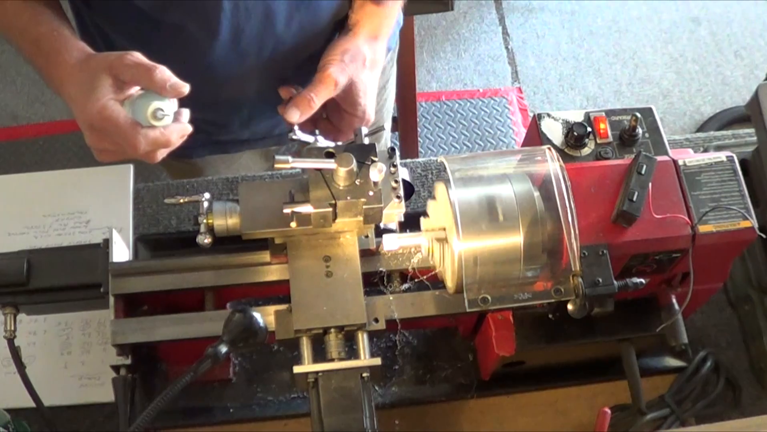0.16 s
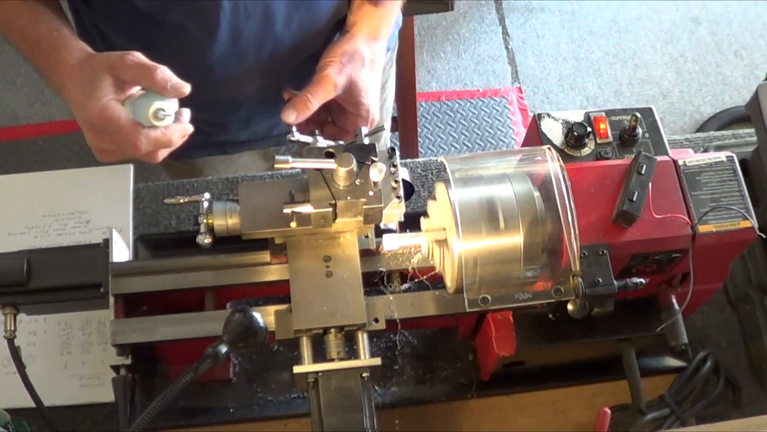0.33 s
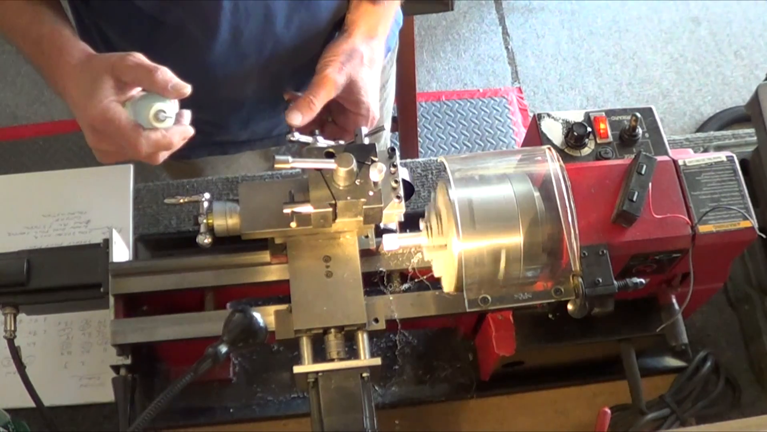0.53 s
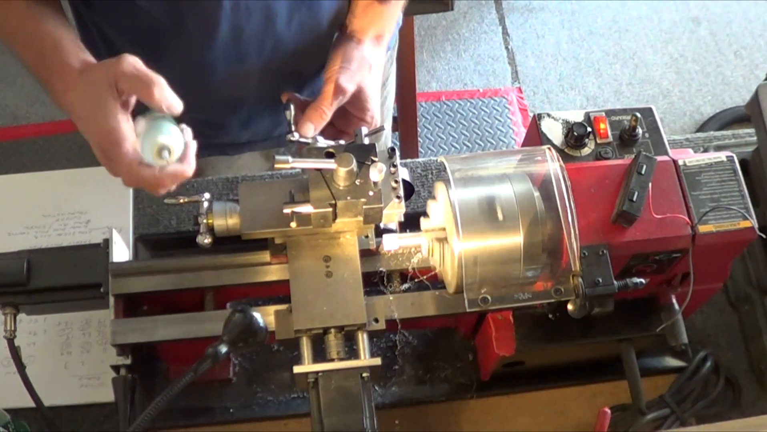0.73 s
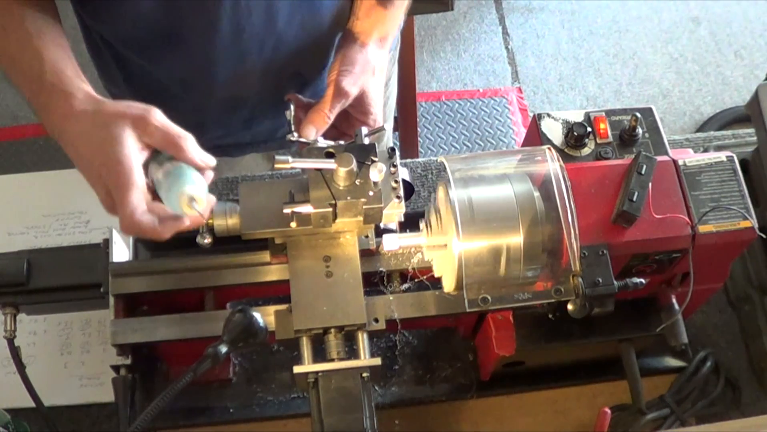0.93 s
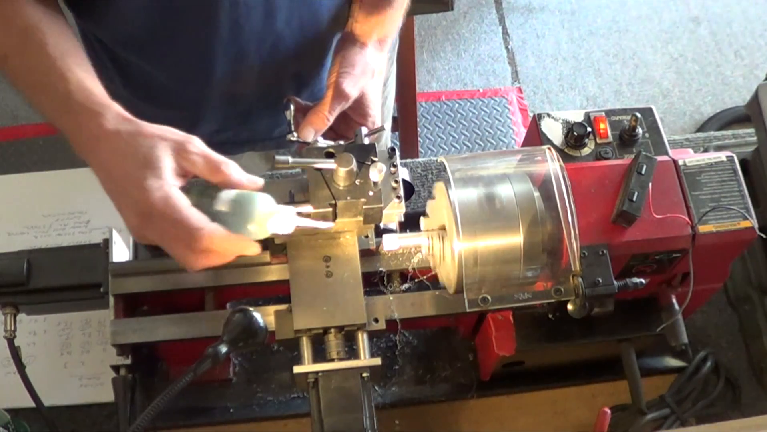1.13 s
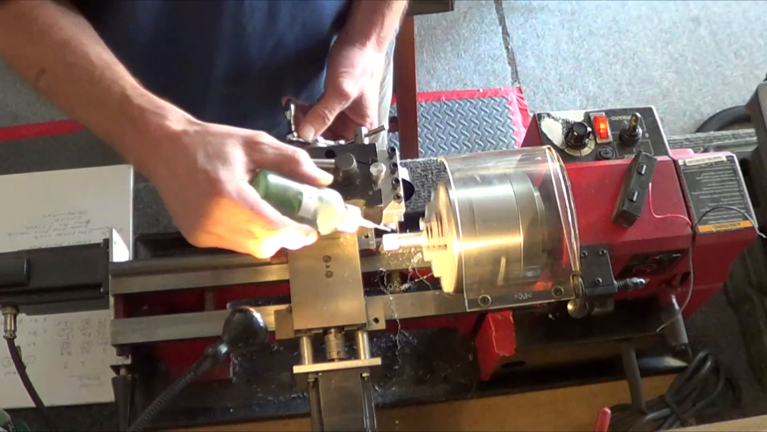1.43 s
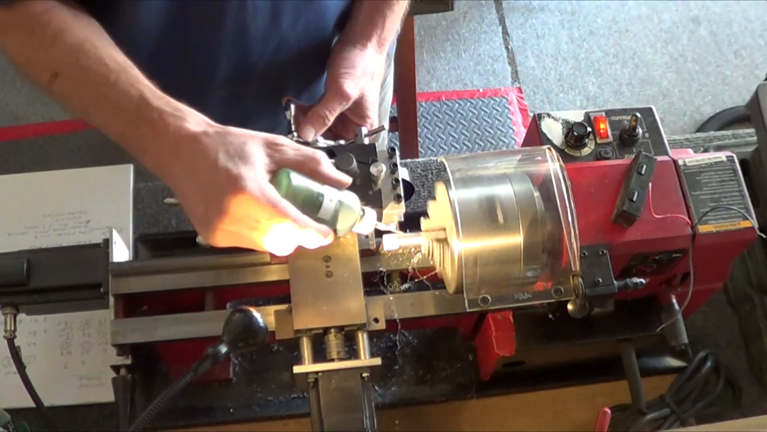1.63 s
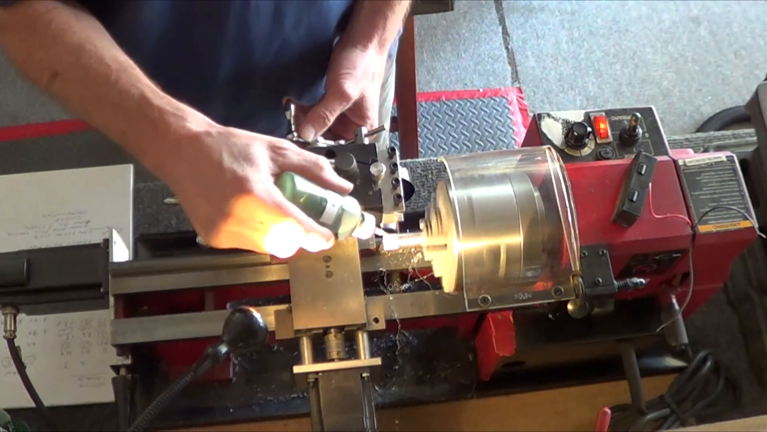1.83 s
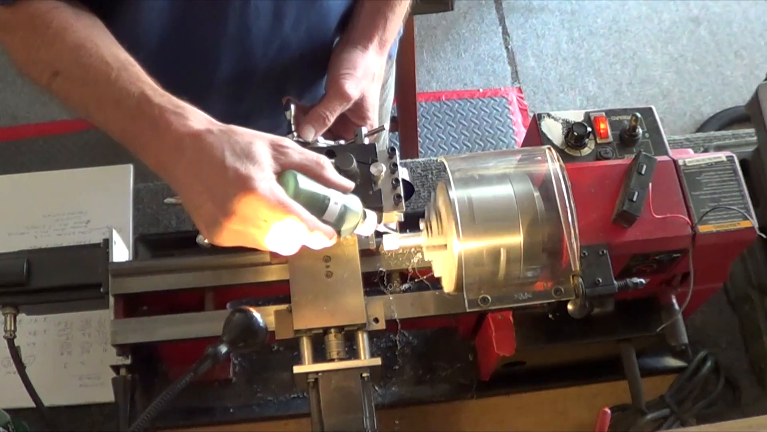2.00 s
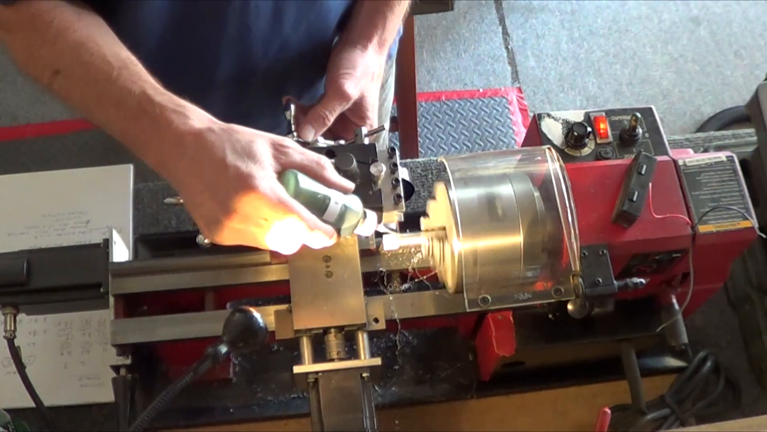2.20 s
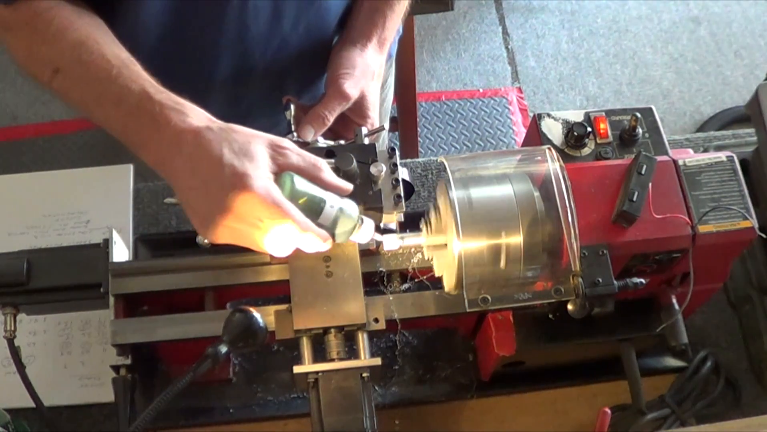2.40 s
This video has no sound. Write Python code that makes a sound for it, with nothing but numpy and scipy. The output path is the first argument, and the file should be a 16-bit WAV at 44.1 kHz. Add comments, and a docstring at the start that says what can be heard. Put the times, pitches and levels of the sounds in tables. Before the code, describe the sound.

A small metal lathe hums and whines while the work scrapes and squeals rhythmically against a tool

```python
"""A small metal lathe in a workshop: from the start the motor hums, a thin steady whistle sounds high above,
and the gears rattle. Then, once a turn, the work rubs on the tool with a gritty scrape; the carriage shudders,
the bed growls. Tool modes add short, beating squeals that grow turn by turn, amid stray ticks and knocks. Last,
the rubs ease off and faint squeaks sag in pitch. Tones are sines; the rest is filtered noise."""
import sys
import numpy as np
from scipy import signal
from scipy.fft import rfft, irfft, next_fast_len
from scipy.io import wavfile

SR = 44100
rng = np.random.default_rng(int(sys.argv[2]) if len(sys.argv) > 2 else 0)


def waveform_to_disk(signal):
    """Save audio, clipped to [-1, 1], as 16-bit WAV at the path in sys.argv[1]."""
    frames = np.transpose(np.atleast_2d(signal))
    scaled = np.clip(frames, -1, 1) * 32767
    samples = np.round(scaled).astype(np.int16)
    wavfile.write(sys.argv[1], SR, samples)


N = 112454  # length in samples

# One rub of work on tool per turn: hardest contact t/s, scrape level/dB, tool ring level/dB,
# squeal level/dB, carriage shudder level/dB
RUB_EVENTS = [(0.259, -39.5, -34.5, -73, -46), (0.426, -33.5, -33, -48, -38),
              (0.598, -34, -32.5, -29.5, -49), (0.764, -34, -35.5, -37, -39),
              (0.937, -35, -31.5, -33, -30.5), (1.106, -35.5, -36, -35, -29.5),
              (1.274, -37, -43, -33.5, -38.5), (1.448, -35.5, -39, -26, -32.5),
              (1.617, -37.5, -42, -25, -32.5), (1.789, -38, -42, -21, -29.5),
              (1.958, -37, -51, -20.5, -31.5), (2.093, -47, -47, -31, -31), (2.295, -59, -60, -43.5, -39),
              (2.446, -47, -39.5, -41, -37.5)]


def undb(db):
    """Level definition: 20 dB is a factor of ten in amplitude."""
    return 10 ** (np.asarray(db) / 20)


def unit(x):
    """Normalization to a root-mean-square amplitude of 1."""
    return x / np.sqrt(np.mean(x ** 2))


def noise():
    """White noise: independent Gaussian samples."""
    return rng.standard_normal(N)


def walk(rate):
    """Low-passed noise: a smooth random drift of rms 1, its spectrum falling beyond rate (Hz)."""
    size = next_fast_len(N, real=True)
    f = np.fft.rfftfreq(size, 1 / SR)
    spectrum = rfft(rng.standard_normal(size)) / (1 + (f / rate) ** 2) ** 2
    return unit(irfft(spectrum, size)[:N])


def colour(x, points):
    """Linear filtering: a gain in dB interpolated between (Hz, dB) points on a log frequency axis."""
    hz, db = np.array(points).T
    log_f = np.log(np.fft.rfftfreq(N, 1 / SR) + 1)
    return irfft(rfft(x) * undb(np.interp(log_f, np.log(hz), db)), N)


def resonate(x, hz, width):
    """Damped resonance: a second-order band-pass of given width (Hz), its output brought to rms 1."""
    size = next_fast_len(N, real=True)
    f = np.fft.rfftfreq(size, 1 / SR) + 1  # avoids division by zero
    response = 1 / (1 + 1j * (f - hz * hz / f) / width)
    return unit(irfft(rfft(x, size) * response, size)[:N])


def grit(spread_db):
    """Impact noise: rapid random level changes make the grains uneven in size."""
    return unit(noise() * undb(spread_db * walk(2250)))


def tone(hz):
    """Phase is the integral of frequency: a sine of rms 1 following a pitch curve."""
    return np.sqrt(2) * np.sin(2 * np.pi * (np.cumsum(hz) / SR + rng.random()))


def swell(t, rise, fall):
    """Gaussian envelope with separate rise and fall times (s) around t = 0."""
    return np.exp(-(t / np.where(t < 0, rise, fall)) ** 2)


def motor(t):
    """Rotating machinery: tones share one wavering speed, over load-dependent rumble. Apart from these, a thin
    steady whistle sounds high above."""
    # Steady tones of motor and gears: f/Hz, level/dB
    tone_lines = [(72.5, -54), (113, -59.5), (193.8, -56), (240, -46.5), (290.5, -45), (360, -44),
                  (448, -58.5), (480, -56.5), (531, -50), (770, -58.5), (1010.4, -46.5), (2141, -52),
                  (3269, -48), (4281.5, -52)]
    # Spectral shape of the drive rumble: f/Hz, relative level/dB
    rumble_shape = [(25, -50), (45, -36), (60, -5.5), (85, -15), (140, -12), (200, -4), (260, -3.5),
                    (300, 2.5), (400, -3), (520, -3.5), (660, -20.5), (900, -15), (1400, -32)]
    # Change of rumble as the tool takes up load: t/s, relative level/dB
    load_curve = [(0, -3), (.4, -2), (1.2, -1.5), (1.75, 0.5), (2.55, 0.5)]
    flutter_db, rumble_db = 0.5, -36.5
    speed = 1 + 0.00052 * walk(5.1)  # rms waver as a fraction

    lines = sum(undb(db + flutter_db * walk(28)) * tone(hz * speed) for hz, db in tone_lines)
    load_db = np.interp(t, *np.array(load_curve).T)
    rumble = undb(rumble_db + load_db) * unit(colour(noise(), rumble_shape))
    whistle = undb(-62) * tone(np.full(N, 15734))
    return lines + rumble + whistle


def gears(t):
    """Forced vibration: teeth rattle with the motor's torque pulses; grit rings the housing in surges."""
    # Spectral shape of the tooth rattle: f/Hz, relative level/dB
    rattle_shape = [(500, -10), (1000, 1), (1800, -4), (2250, 4.5), (2900, -4.5), (3150, -3), (3450, -1.5),
                    (4300, -0.5), (4750, -7), (5600, -12.5), (8000, -8.5), (10500, -11), (13000, -20.5),
                    (15800, -27)]
    # Resonances of the gear housing: f/Hz, width of the narrower filter/Hz, level/dB
    housing_modes = [(1365, 15, -52), (1532, 57, -51.5), (2159, 37, -50.5), (2406, 150, -59),
                     (3288, 31, -45.5), (3367, 24, -47.5), (3525, 41, -49), (3710, 79, -51.5),
                     (4285, 61, -46), (4920, 40, -58), (6970, 180, -56), (8040, 41, -56), (11270, 260, -63)]
    rattle_db, grit_db, surge_db = -39.5, 2.5, 1
    pulse_hz, pulse_depth = 118.2, 0.097

    teeth = grit(grit_db) * (1 + pulse_depth * np.sin(2 * np.pi * pulse_hz * t))
    rattle = undb(rattle_db) * unit(colour(teeth, rattle_shape))
    rings = 0
    for hz, width, db in housing_modes:
        # A broad stage after the narrow one steepens the skirts
        ring = resonate(resonate(grit(grit_db), hz, width), hz, 5 * width)
        rings = rings + undb(db + surge_db * walk(31)) * ring
    return rattle + rings


def workshop(x):
    """Diffuse reverberation: convolution with exponentially decaying noise of unit energy."""
    t60_s = 0.12  # time to decay by 60 dB
    t = np.arange(SR // 2) / SR
    tail = rng.standard_normal(len(t)) * np.exp(-np.log(1000) * t / t60_s)
    return irfft(rfft(x) * rfft(tail / np.sqrt(np.sum(tail ** 2)), N), N)


def rubbing(t):
    """Sliding friction: a choppy rasp excites the tool's resonances, and the tool sings as it bites."""
    # Spectral shape of the scrape: f/Hz, relative level/dB
    scrape_shape = [(400, -5), (900, -4.5), (1450, -6.5), (1900, -2.5), (2500, 0.5), (3000, -3), (3700, 9),
                    (4600, 0), (5500, -13), (6300, -3.5), (7300, -5.5), (7900, -3.5), (8800, -1),
                    (9600, -5.5), (11200, -6), (13500, -15.5), (14500, -9), (15800, -28)]
    # Resonances of tool and holder: f/Hz, width/Hz, level relative to the shaped scrape/dB
    tool_modes = [(6030, 210, -16.5), (6390, 200, -12.5), (7060, 61, -4.5), (7550, 140, -5),
                  (8220, 120, -15), (8980, 100, -12)]
    rise_s, fall_s, grit_db = 0.043, 0.022, 3
    ring_hz, ring_wander_hz, ring_lead_s, ring_s = 3887, 98.3, 0.012, 0.016
    chop_db, chop_hz = 2.5, 254

    contact = sum(undb(r[1]) * swell(t - r[0], rise_s, fall_s) for r in RUB_EVENTS)
    rasp = unit(colour(grit(grit_db), scrape_shape))
    rasp = rasp + sum(undb(db) * resonate(grit(grit_db), hz, width) for hz, width, db in tool_modes)
    chop = unit(undb(chop_db * walk(chop_hz)))
    # The ring peaks just before the hardest contact
    bite = sum(undb(r[2]) * swell(t - r[0] + ring_lead_s, ring_s, ring_s) for r in RUB_EVENTS)
    ring = tone(ring_hz + ring_wander_hz * walk(540))
    return chop * (contact * rasp + bite * ring)


def carriage_shudder(t):
    """Structural resonance: the carriage shudders at a wandering low pitch just after each rub."""
    pitch_hz, wander_hz, lag_s, spread_s = 297.2, 13.5, 0.015, 0.018
    shudder = sum(undb(r[4]) * swell(t - r[0] - lag_s, spread_s, spread_s) for r in RUB_EVENTS)
    return shudder * tone(pitch_hz + wander_hz * walk(65))


def bed_growl(t):
    """Force transmission: the bed growls under the cutting force, its envelope scaled by scrape level."""
    # Spectral shape of the growl: f/Hz, relative level/dB
    growl_shape = [(40, -47), (90, -23), (190, 1.5), (300, 3.5), (450, 1.5), (560, -2), (700, -16),
                   (1000, -7.5), (1400, -12.5), (2000, -12.5), (3500, -33)]
    growl_db, lag_s, spread_s = -1.5, 0.011, 0.052  # level relative to the scrape
    force = sum(undb(r[1]) * swell(t - r[0] - lag_s, spread_s, spread_s) for r in RUB_EVENTS)
    return undb(growl_db) * force * unit(colour(noise(), growl_shape))


def squeal(t):
    """Friction-driven modes: tool tones grow and die exponentially; the two strongest, close ones beat."""
    # Squealing modes of the tool: f/Hz, relative level/dB
    squeal_modes = [(6330, -27), (6930, -12), (7192, -1), (7391, 0), (7650, -22), (8480, -13), (8830, -18)]
    grow_s, die_s, rough_db = 0.012, 0.0055, 0.5
    jitter = 0.008  # rms fraction of the pitch

    grip = 0
    for r in RUB_EVENTS:
        time_constant = np.where(t < r[0], grow_s, die_s)
        grip = grip + undb(r[3]) * np.exp(-np.abs(t - r[0]) / time_constant)
    modes = sum(undb(db) * tone(hz * (1 + jitter * walk(280))) for hz, db in squeal_modes)
    return grip * undb(rough_db * walk(220)) * modes


def ticks_and_knocks(t):
    """Impulsive excitation: band-limited noise starts at once and decays exponentially."""
    # Stray ticks and knocks: onset t/s, f/Hz, width/Hz, onset level/dB, decay time constant/s
    knock_events = [(.485, 1385, 90, -36, 0.017), (.62, 1380, 150, -41, .012),
                    (0.792, 1350, 70, -33.5, 0.027), (1.112, 1530, 120, -39, .02),
                    (1.442, 1520, 100, -39.5, 0.016), (1.648, 1520, 150, -35, 0.009),
                    (1.885, 9000, 7000, -31.5, 0.007), (2.275, 167, 29.7, -35, 0.035),
                    (2.311, 2120, 260, -31, 0.014), (2.436, 4500, 5000, -32.5, 0.0041)]
    knocks = 0
    for start, hz, width, db, decay in knock_events:
        envelope = (t > start) * np.exp(-np.abs(t - start) / decay)
        knocks = knocks + undb(db) * envelope * resonate(noise(), hz, width)
    return knocks


def easing_squeaks(t):
    """Frequency and amplitude modulation: grainy squeaks sag in pitch as the rub eases."""
    # Faint squeaks: centre t/s, f at centre/Hz, level/dB
    squeak_events = [(2.125, 6200, -43), (2.29, 5960, -50), (2.411, 5740, -50), (2.474, 6000, -50)]
    spread_s, sag_hz_per_s, rough_db = 0.019, 5400, 5
    pitch = 1 + 0.018 * walk(550)  # shared pitch jitter
    squeaks = 0
    for centre, hz, db in squeak_events:
        sagging = tone(hz * pitch - sag_hz_per_s * (t - centre))
        squeaks = squeaks + undb(db) * swell(t - centre, spread_s, spread_s) * sagging
    return squeaks * undb(rough_db * walk(400))


def scene():
    """Superposition: machine and cutting sounds add, with room sound opposed between the two ears."""
    # Share of room sound that differs between the ears: f/Hz, gain level/dB
    width_shape = [(30, -35), (125, -5), (280, -14.5), (550, -6), (1000, -9.5), (2000, -11), (4000, -12),
                   (8000, -11.5), (11000, -36)]
    room_db = -18
    t = np.arange(N) / SR
    drive = motor(t) + gears(t)
    cutting = rubbing(t) + carriage_shudder(t) + bed_growl(t) + squeal(t)
    cutting = cutting + ticks_and_knocks(t) + easing_squeaks(t)
    mid = drive + cutting + undb(room_db) * workshop(cutting)
    side = colour(workshop(drive + cutting), width_shape)
    return np.array([mid + side, mid - side])


def record(dry):
    """Band limitation: a steep elliptic low-pass removes the treble above 15.78 kHz."""
    ripple_db, stop_db, top_hz = 0.1, 80, 15780
    low_pass = signal.ellip(12, ripple_db, stop_db, top_hz, fs=SR, output="sos")
    return signal.sosfilt(low_pass, dry)


dry = scene()
out = record(dry)
waveform_to_disk(out)
```